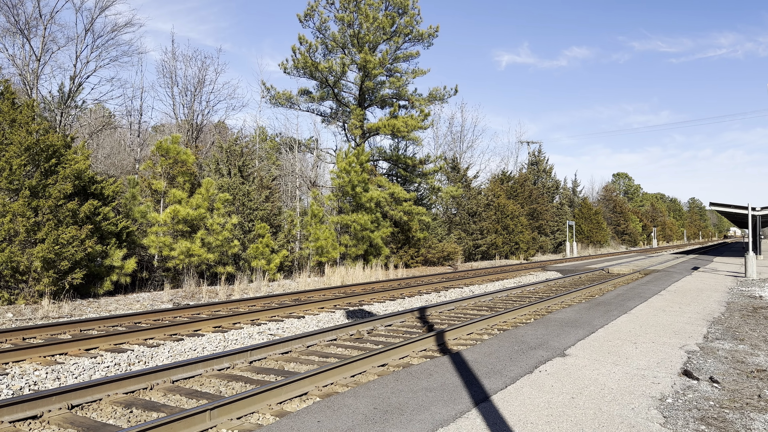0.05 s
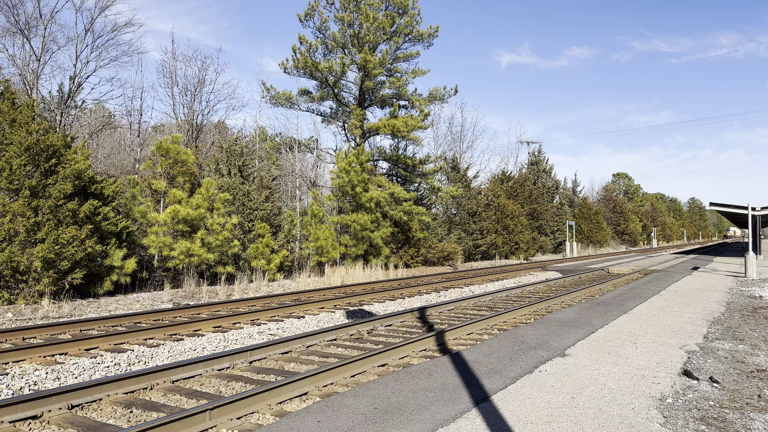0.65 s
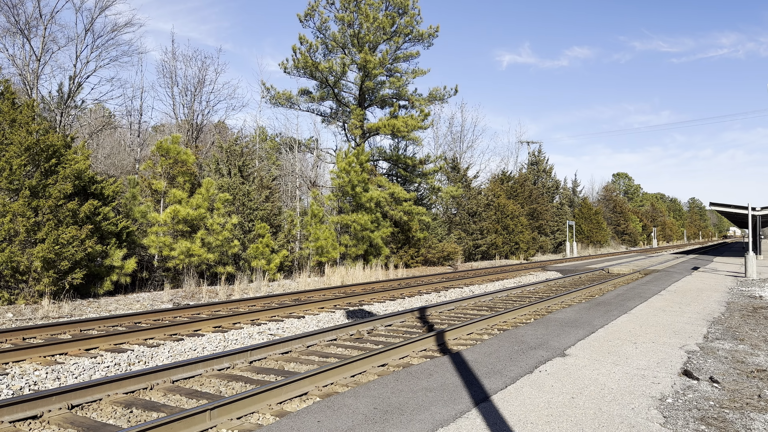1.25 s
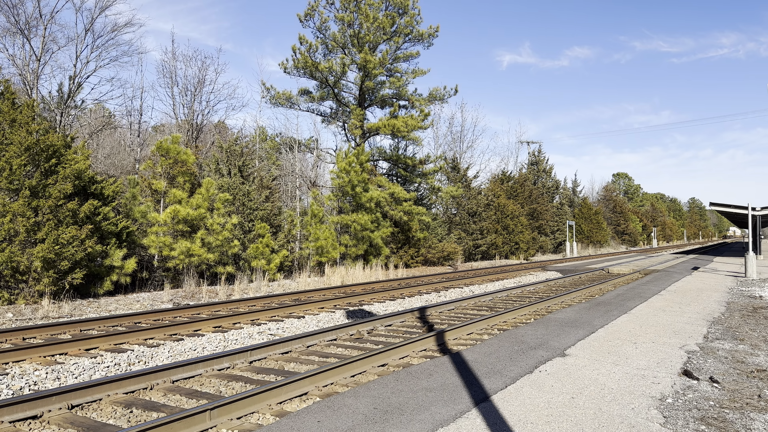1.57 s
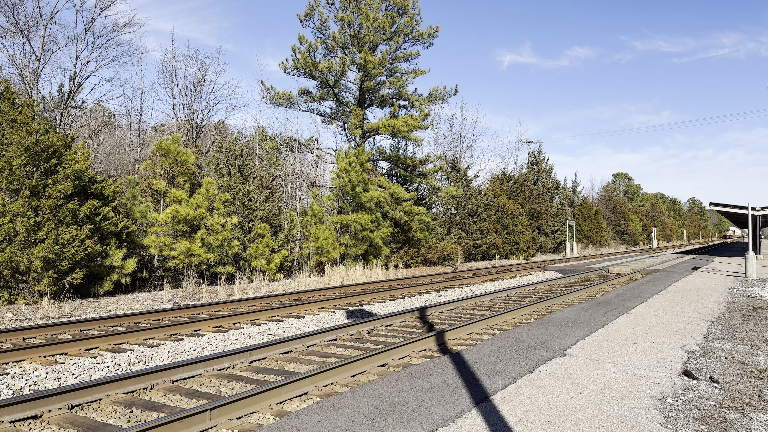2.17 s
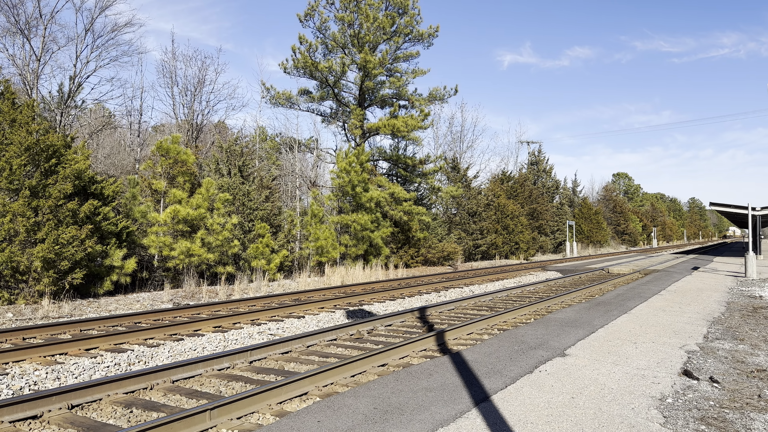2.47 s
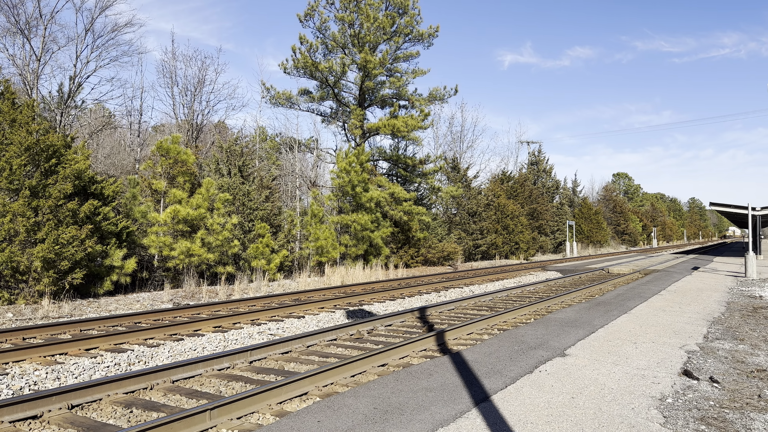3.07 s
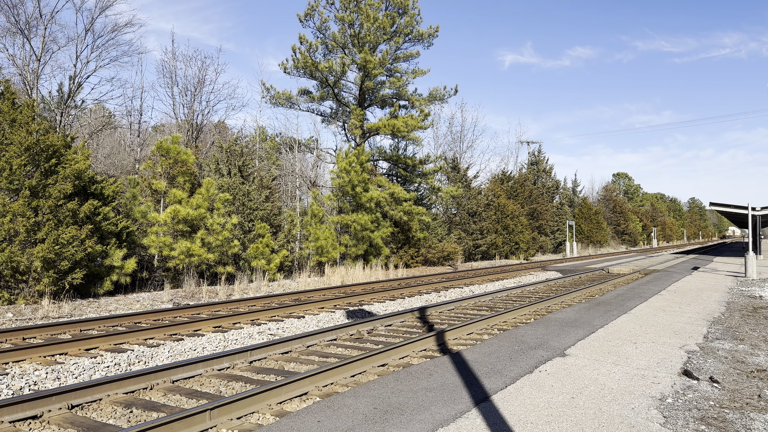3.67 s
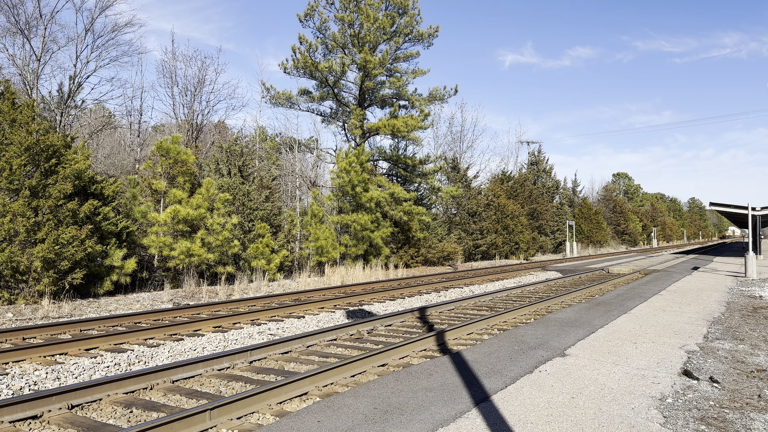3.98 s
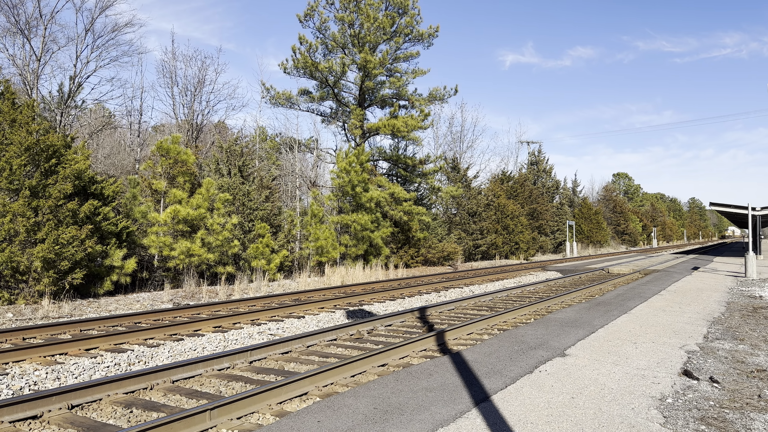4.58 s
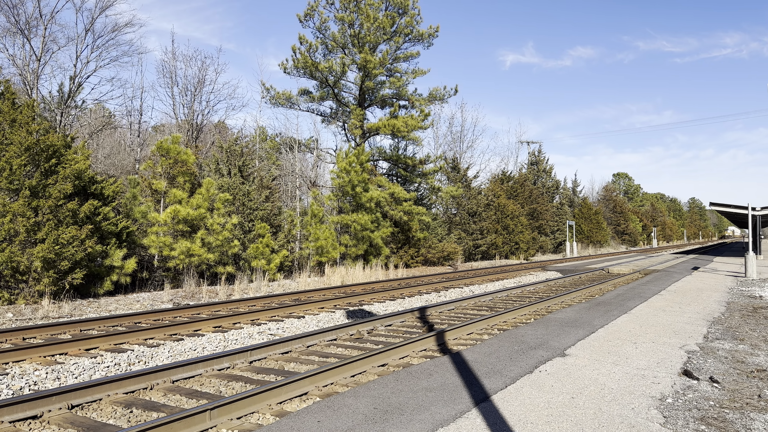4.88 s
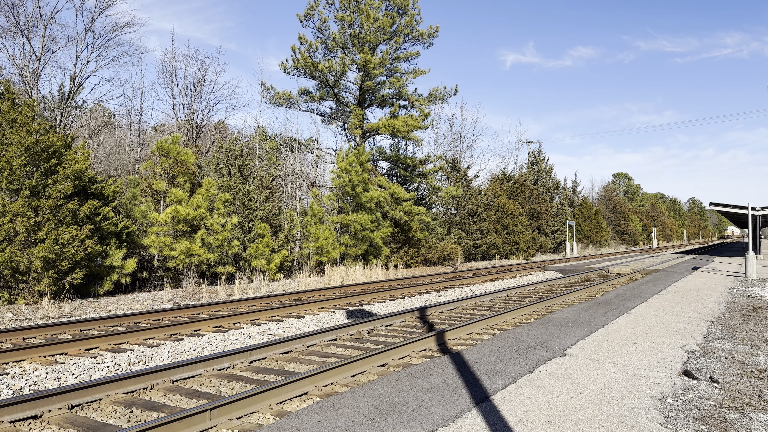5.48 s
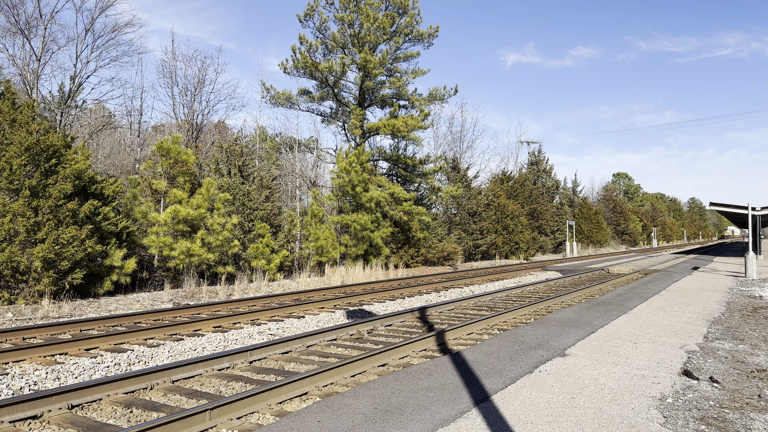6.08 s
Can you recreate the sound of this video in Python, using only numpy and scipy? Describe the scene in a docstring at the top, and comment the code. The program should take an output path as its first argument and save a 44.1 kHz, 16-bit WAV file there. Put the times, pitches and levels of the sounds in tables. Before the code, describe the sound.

Beside a railway platform, a distant diesel engine throbs over a steady low rumble and slowly grows louder. A crow caws once and small birds add faint, very high trills. Three soft, quick bumps hit the microphone about a second in. A road vehicle drones quietly, pulling away and easing off against far traffic. In the second half crows call again, becoming harsher and more frequent, echoing from the trees.

```python
"""Beside a railway platform, a distant diesel throbs as its shaft orders beat, and slowly grows louder.
A road vehicle pulls away and eases off, its exhaust droning at harmonics of the firing rate.
Crow-like birds call from the trees, small birds add very high lisping trills, and the wood's edge
echoes them. Underneath lie a low rumble, the hush of far traffic and a faint hiss.
Three soft bumps reach the microphone in quick succession."""
import sys
import numpy as np
from scipy import signal
from scipy.fft import rfft, irfft, next_fast_len
from scipy.io import wavfile
from scipy.ndimage import map_coordinates

SR = 44100
rng = np.random.default_rng(int(sys.argv[2]) if len(sys.argv) > 2 else 0)


def to_wav(sig):
    """Store sig (one row per channel, or 1-D mono) as 16-bit WAV at the path in sys.argv[1].

    Samples outside -1..1 are clipped; the rate is SR.
    """
    pcm = np.clip(np.atleast_2d(sig), -1, 1) * 32767
    pcm = np.round(pcm).astype(np.int16)
    wavfile.write(sys.argv[1], SR, pcm.T)  # frames by channels


N = 279594
TIME = np.arange(N) / SR


def amp(db):
    """Amplitude ratio of a level: tenfold for every 20 dB."""
    return 10 ** (np.asarray(db) / 20)


def unit(x):
    """Normalisation to rms 1."""
    return x / np.sqrt(np.mean(x ** 2) + 1e-20)


def along(points, hz):
    """Interpolation of (f/Hz, value) points on a logarithmic frequency axis."""
    f, v = np.transpose(points)
    return np.interp(np.log(hz + 1), np.log(f + 1), v)


def curves(rows):
    """Linear interpolation in time: one curve for each column after t/s."""
    s, *cols = np.transpose(rows)
    return [np.interp(TIME, s, c) for c in cols]


def gaussian(s, width):
    """A Gaussian pulse centred on time s, falling to 1/e at width seconds either side."""
    return np.exp(-((TIME - s) / width) ** 2)


def wobble(rate, size=N):
    """Smooth random fluctuation: a spline through rate knots a second."""
    knots = rng.standard_normal(int(size * rate / SR) + 4)
    return map_coordinates(knots, [np.arange(size) * rate / SR])


def filtered(x, response):
    """Filtering as multiplication of the spectrum; mirrored margins keep the ends smooth."""
    margin = SR // 4
    wide = np.pad(x, [(0, 0)] * (x.ndim - 1) + [(margin, margin)], mode="reflect")
    m = next_fast_len(N + 2 * margin)
    return irfft(rfft(wide, m) * response(np.fft.rfftfreq(m, 1 / SR)), m)[..., margin:margin + N]


def tone(hz):
    """A sinusoid of rms 1 whose phase is the integral of its frequency."""
    return np.sqrt(2) * np.sin(2 * np.pi * (np.cumsum(hz) / SR + rng.random()))


def hoarse(hz, rough, spread_hz):
    """Random modulation spreads a share, rough, of a partial's power into a narrow band around it."""
    rough = np.clip(rough, 0, 1)
    smear = sum(tone(hz) * wobble(2 * spread_hz, len(hz)) for _ in range(3))
    return np.sqrt(1 - rough) * tone(hz) + np.sqrt(rough) * unit(smear)


def add(track, s, sound):
    """Superposition of a sound on a track from time s."""
    room = track[max(round(s * SR), 0):][:len(sound)]
    room += sound[:len(room)]


def rush(colour):
    """Partly coherent stereo noise, mid signal of rms 1: narrow in the bass, wide in the midrange."""
    # stereo width: f/Hz, side minus mid/dB
    width = [(60, -7.5), (91, -12), (140, -9.5), (210, -3.5), (320, -1), (490, 3), (740, 5), (1130, 4.5),
             (1710, 1.5), (2600, 0)]
    white = rng.standard_normal((2, N))
    mid, side = filtered(white, lambda hz: colour(hz) * amp([np.zeros_like(hz), along(width, hz)]))
    return np.array([mid + side, mid - side]) / np.std(mid)


def placed(x, lag_s):
    """Time difference of arrival: the left microphone hears the source lag_s later than the right."""
    return filtered(x, lambda hz: np.exp(1j * np.pi * hz * lag_s * np.array([[-1], [1]])))


def panned(db):
    """Level difference: the two channel gains for a left minus right level."""
    return amp(db * np.array([[.5], [-.5]]))


def diesel(start_hz=19.68, sag_hz_per_s=.412, fade_first_s=.49, fade_period_s=.776, waver_db=.5):
    """Beating: shaft orders 4 and 5 interfere, so the engine throbs at its slowly falling shaft speed."""
    # the engine draws nearer: t/s, relative level of order 4/dB, of order 5/dB
    approach = [(0, -47.5, -45), (.5, -44, -75.5), (.9, -53.5, -48), (1.4, -57.5, -44.5), (1.8, -46.5, -54),
                (2.7, -48.5, -43.5), (3.2, -41.5, -43), (3.75, -38, -44), (4.5, -45.5, -39.5),
                (5.7, -37.5, -40.5), (6.1, -44, -44), (6.34, -42.5, -41)]
    # weaker partials: multiple of the shaft speed, level relative to order 5/dB
    minor_orders = [(2, -14), (3, -24.5), (6, -12), (7, -35), (9, -23), (11, -24.5), (12, -24.5)]
    shaft_hz = start_hz - sag_hz_per_s * TIME
    fourth_db, fifth_db = curves(approach)
    # order 4 comes and goes in a slow, even beat that grows shallow
    depth = gaussian(0, width=1.6)
    fade = np.abs(1 - depth * np.exp(2j * np.pi * (TIME - fade_first_s) / fade_period_s))
    throb = fade * amp(fourth_db) * tone(4 * shaft_hz) + amp(fifth_db) * tone(5 * shaft_hz)
    minor = sum(amp(fifth_db + db - waver_db * wobble(5.2)) * tone(k * shaft_hz)
                for k, db in minor_orders)
    return placed(amp(.5) * throb + minor, lag_s=.00025)


def vehicle(cruise_hz=85, waver_db=1.08, jitter=.003):
    """Exhaust harmonics follow the firing rate and dull as the throttle shuts; ground echoes notch them."""
    # pulling away, then easing off: t/s, firing rate/Hz, throttle (0-1)
    drive = [(0, 80.85, .2), (1.7, 83.91, .92), (3.2, 86.59, .95), (4.45, 88.32, 1), (4.7, 88.4, .3),
             (5.2, 88.48, .3), (5.6, 86.64, .05), (5.95, 83, .7), (6.34, 78.88, .55)]
    # the drone swells and fades with distance: t/s, gain/dB
    distance_gain = [(0, -4), (1, 0), (1.75, 1.5), (3.5, 0.5), (4.4, 1), (5.2, 1.5), (6.34, -3.5)]
    # exhaust harmonics: number, relative level at cruise on full throttle/dB,
    # slope with firing rate/(dB/Hz), loss with the throttle shut/dB
    exhaust = [(2, -60, 2, -0.5), (3, -61, 1.5, 7), (4, -57.5, -0.5, 16.5), (5, -72, 0.66, 8.5),
               (6, -79.5, .5, 8.5), (7, -80.5, 2, 8)]
    # destructive interference with the ground path: t/s, half width/s, harmonic number, depth/dB
    ground_dips = [(.53, 0.028, 4, 8.5), (1.35, 0.12, 4, 6), (1.55, 0.18, 3, 7), (2.15, 0.15, 4, 3),
                   (2.619, .16, 3, 7.5), (2.769, .12, 4, 7.5), (3.35, 0.17, 3, 6.5), (3.65, 0.19, 2, 6),
                   (3.68, 0.16, 3, 6), (3.82, 0.16, 4, 4.5), (4.699, 0.15, 4, 9), (4.87, 0.11, 2, 4),
                   (5.68, 0.18, 3, 10.5)]
    firing_hz, throttle = curves(drive)
    level_db, = curves(distance_gain)
    uneven_hz = firing_hz * (1 + jitter * wobble(30))
    drone = np.zeros(N)
    for k, db, slope, shut_db in exhaust:
        load_db = db + slope * (firing_hz - cruise_hz) - shut_db * (1 - throttle)
        dip_db = sum(depth * gaussian(s, width) for s, width, number, depth in ground_dips if number == k)
        drone += amp(load_db - dip_db + waver_db * wobble(6.6)) * tone(k * uneven_hz)
    return placed(amp(level_db) * drone, lag_s=-.00014)


def rumble(base_db=-44.5, drift_db=1):
    """Low-frequency noise under slow amplitude modulation: it drifts, and swells once."""
    # spectrum of the rumble: f/Hz, relative spectrum level/dB
    spectrum = [(18, -34.5), (33, -14.5), (55, 4.5), (85, 4), (115, -2), (150, -12.5), (215, -14.5),
                (300, -22), (420, -33.5), (700, -50.5), (1500, -77.5)]
    # its swell: t/s, half width/s, rise/dB
    swells = [(1.0, 0.22, 4)]
    swell_db = sum(db * gaussian(s, width) for s, width, db in swells)
    return amp(base_db + drift_db * wobble(2.4) + swell_db) * rush(lambda hz: amp(along(spectrum, hz)))


def far_traffic(hush_gain_db=2, drift_db=.4):
    """Broadband road noise swells slowly; the tyres sing in two narrow, resonance-shaped bands."""
    # swell of the traffic: t/s, relative level/dB
    flow = [(0, -67), (.7, -66.5), (1.7, -67), (2.05, -67), (2.45, -67.5), (3.25, -63.5), (4.4, -63.5),
            (5.55, -64), (6.34, -66)]
    # spectrum of the hush: f/Hz, relative spectrum level/dB
    spectrum = [(200, -2), (400, 0.5), (640, 0.5), (800, -1), (1080, -3), (1330, -5), (1600, -11.5),
                (1850, -16.5), (2200, -25.5), (2700, -31.5), (3500, -39), (6000, -87)]
    # tyre song: f/Hz, half width/Hz, level relative to the flow/dB, extra gain with the swell/(dB/dB)
    tyre_bands = [(644.6, 6.9, -9.5, -0.5), (908, 45, -9.5, 2)]
    road_db, = curves(flow)
    swell_db = road_db - np.mean(road_db)
    road = amp(road_db + hush_gain_db + drift_db * wobble(7)) * rush(lambda hz: amp(along(spectrum, hz)))
    for centre, width, db, growth in tyre_bands:
        tyre_db = road_db + db + growth * swell_db + drift_db * wobble(2)
        road += amp(tyre_db) * rush(lambda hz: 1 / (1 + ((hz - centre) / width) ** 2))
    return road


def hiss(level_db=-92):
    """Stationary noise, faint and confined to the treble."""
    # spectrum of the hiss: f/Hz, relative spectrum level/dB
    spectrum = [(1500, -32), (3000, 3), (5000, 4), (6900, 1.5), (7800, -4), (10000, -3.5), (13000, -11.5),
                (14300, -13.5), (15500, -29.5)]
    return amp(level_db) * rush(lambda hz: amp(along(spectrum, hz)))


def crows(jitter=.028, fray_hz=80, usual_length_s=.16, echo_db=-20.5, harsh_echo_db=20):
    """Source and filter: five harmonics arch in pitch through the fixed formants of a throat."""
    # calls: t/s, duration/s, top f/Hz, arch exponent, relative level/dB, roughness (0-1),
    # gain of harmonic 3/dB, gain of harmonics 4 and 5/dB
    caws = [(.347, .15, 809.5, 1.09, -57, .06, -11.5, -32), (3.217, .08, 858, 1.25, -59, 0.024, -22, -33),
            (3.68, .09, 872, 1.35, -59.5, 0.026, -20, -32.5),
            (4.259, .076, 862, 1.07, -61, .025, -22.5, -29.5),
            (4.79, .165, 734, 1.35, -56.5, .36, -11.5, -26), (4.93, .28, 816, .75, -65.5, 0.9, -8.5, -11.5),
            (5.384, .21, 666, .5, -57.5, 0.52, -13, -14), (5.5, .3, 825, 1, -66, .9, -8, -7),
            (5.64, 0.13, 755, .6, -70, 0.9, -11, 1.5), (5.795, .08, 751, .27, -63, .35, -2, 0.5),
            (6.025, .08, 766, .37, -61, .45, -2.5, -9), (6.088, .175, 728, 1.15, -57, .42, -9.5, -12.5),
            (6.241, .09, 798, .3, -62, 0.39, 3.5, -3.5)]
    # arch of one call: share of its course, pitch ratio, gain/dB
    contour = [(0, .8, -20), (.1, .905, -6.5), (.2, .975, -1), (.33, 1, 0), (.47, .988, -.5),
               (.62, .945, -2), (.8, .885, -4.5), (1, .8, -15)]
    # formants of the throat: f/Hz, gain/dB
    throat = [(700, -31.5), (1150, 7), (1400, 5.5), (1700, 5), (2200, -8), (2650, -25), (3050, -16),
              (3350, -20), (3750, -26), (4200, -43)]
    direct, blurred, scattered = np.zeros((3, N))
    share, ratio, shape_db = np.transpose(contour)
    for s, length, top_hz, arch, db, rough, third_db, higher_db in caws:
        size = int(length * SR)
        course = np.linspace(0, 1, size) ** np.sqrt(usual_length_s / length)  # short calls peak later
        harsh = np.sqrt(rough)
        pitch = top_hz * np.interp(course, share, ratio) ** arch
        pitch *= 1 + harsh * jitter * wobble(160, size)
        voice = np.zeros(size)
        for k, gain_db in enumerate([0, 0, third_db, higher_db, higher_db], 1):
            spread_hz = fray_hz * np.sqrt(k) * (1 + rough ** 2)  # higher harmonics fray more
            voice += amp(along(throat, k * pitch) + gain_db) * hoarse(k * pitch, rough * k / 2, spread_hz)
        call = voice * amp(db + np.interp(course, share, shape_db)) * signal.windows.tukey(size, .15)
        blur = .2 * rough  # share of the power that arrives by way of nearby branches
        add(direct, s, call * np.sqrt(1 - blur))
        add(blurred, s, call * np.sqrt(blur))
        # harsh calls come from deeper in the wood and echo more
        add(scattered, s, call * amp(echo_db + harsh_echo_db * harsh))
    near = placed(direct, lag_s=.00028) + woods(blurred, t60=.078, delay_s=.0049, swell_s=.01)
    return (near + woods(scattered, t60=.99, delay_s=.015, swell_s=.15)) * panned(.5)


def woods(x, t60, delay_s, swell_s):
    """Scattering from trunks: a diffuse tail builds up after a delay and decays exponentially."""
    t = np.arange(SR) / SR
    late = np.maximum(t - delay_s, 0)
    tail = rng.standard_normal((2, SR)) * amp(-60 * late / t60) * (1 - np.exp(-late / swell_s))
    return signal.fftconvolve(np.atleast_2d(x), tail / np.linalg.norm(tail[0]), axes=1)[:, :N]


def small_birds(trill_hz=30.5, full_buzz_hz=440, pulse_db=5, flutter_db=2, gain_db=-2, echo_db=-5):
    """Frequency and amplitude modulation: a trill makes high notes buzz and pulse, loudest at its dips."""
    # thin notes: t/s, duration/s, start f/Hz, middle f/Hz, end f/Hz, relative level/dB,
    # trill depth/Hz, left minus right/dB
    lisps = [(0.392, 0.12, 8280, 7270, 6760, -79.5, 150, 1), (0.43, 0.13, 7650, 7520, 8130, -86, 410, -7),
             (0.551, 0.18, 8330, 8600, 8860, -94, 88, -16.5), (0.552, 0.066, 3380, 4070, 3450, -90, 13, -5),
             (0.737, 0.082, 8300, 7970, 7770, -87.5, 140, -1),
             (0.781, 0.17, 8200, 8100, 8120, -92.5, 320, -6),
             (1.041, 0.2, 7460, 7170, 7270, -87.5, 450, -9),
             (1.109, 0.017, 6600, 6400, 6700, -77.5, 39, -5), (1.5, .36, 7850, 8400, 8520, -97.5, 150, -16),
             (2.262, 0.12, 6650, 6880, 7030, -96, 330, -4), (2.737, 0.14, 6740, 6750, 6870, -92, 260, -6),
             (3.371, 0.067, 6500, 6700, 6660, -97.5, 170, 1), (3.673, 0.042, 7370, 7240, 7270, -91, 50, 2),
             (5.028, 0.068, 7500, 7260, 7440, -78, 87, 5), (5.07, 0.062, 7470, 7450, 7650, -90, 123, 8)]
    song = np.zeros((2, N))
    for s, length, start, middle, end, db, depth, pan_db in lisps:
        size = int(length * SR)
        t = np.arange(size) / SR
        bend = np.polyval(np.polyfit([0, .5, 1], [start, middle, end], 2), t / length)
        trill = np.cos(2 * np.pi * trill_hz * t)
        buzz = (depth / full_buzz_hz) ** 2
        pitch = bend + depth * (trill + .18 * wobble(300, size))
        note = hoarse(pitch, buzz, spread_hz=300) * signal.windows.tukey(size, .5)
        note *= amp(db + gain_db - pulse_db * buzz * trill + flutter_db * wobble(220, size))
        for channel, heard in zip(song, note * panned(pan_db)):
            add(channel, s, heard)
    return song + amp(echo_db) * woods(song, t60=.16, delay_s=.0019, swell_s=.0031)


def bumps(gain_db=3, attack_s=.002, muffle_hz=340):
    """Soft impacts near the microphone excite low, damped modes; a longer contact gives a duller knock."""
    # impacts: t/s, relative level/dB, contact time/s, factor on the decay time
    impacts = [(.964, -25.5, .0014, 1.6), (1.028, -24, .005, .8), (1.108, -21.5, .0016, .6)]
    # modes: f/Hz, relative level/dB, base T60/s
    modes = [(90, -7, .09), (165, -3, .04), (255, -8, .035)]
    track, t = np.zeros(N), np.arange(SR // 4) / SR
    onset = 1 - np.exp(-(t / attack_s) ** 2)
    for s, db, contact, life in impacts:
        for hz, mode_db, t60 in modes:
            excitation = amp(db + gain_db) * np.exp(-(2 * hz * contact) ** 2)
            ring = amp(mode_db - 60 * t / (life * t60)) * np.sin(2 * np.pi * hz * t)
            add(track, s, excitation * ring * onset)
    return filtered(track, lambda hz: np.exp(-(hz / muffle_hz) ** 4)) * panned(2)


def scene():
    """Superposition of all sources; a level difference leans the whole a little to the left."""
    # stereo balance: f/Hz, left minus right/dB
    lean = [(60, 0.46), (200, 2), (320, 0), (500, 2.5), (1100, 3), (2500, 5), (7000, 4.5)]
    mix = diesel() + vehicle() + rumble() + far_traffic() + hiss() + crows() + small_birds() + bumps()
    return filtered(mix, lambda hz: panned(along(lean, hz)))


def record(dry, whistle_hz=9600, whistle_db=-69, top_hz=15500):
    """Ring modulation in the band-limited recorder adds a faint whistle that flickers with the bass."""
    whistle = amp(whistle_db) * dry * tone(np.full(N, whistle_hz))
    return filtered(dry + whistle, lambda hz: hz < top_hz)


dry = scene()
out = record(dry)
to_wav(out)
```